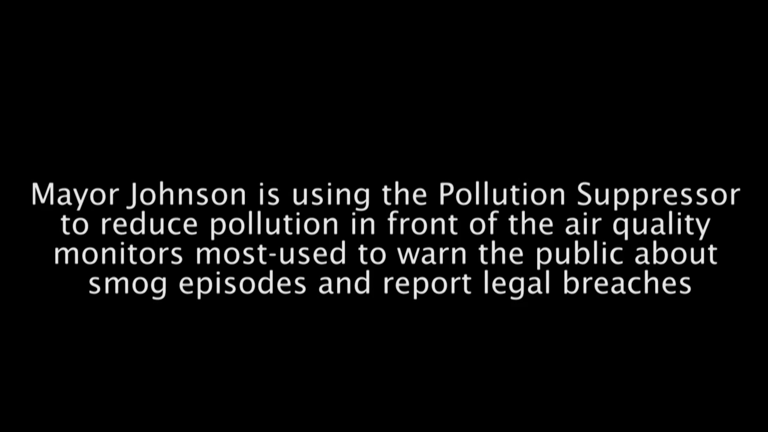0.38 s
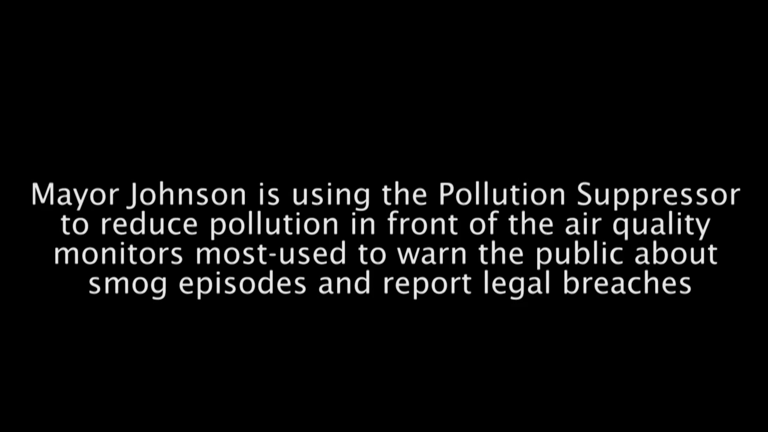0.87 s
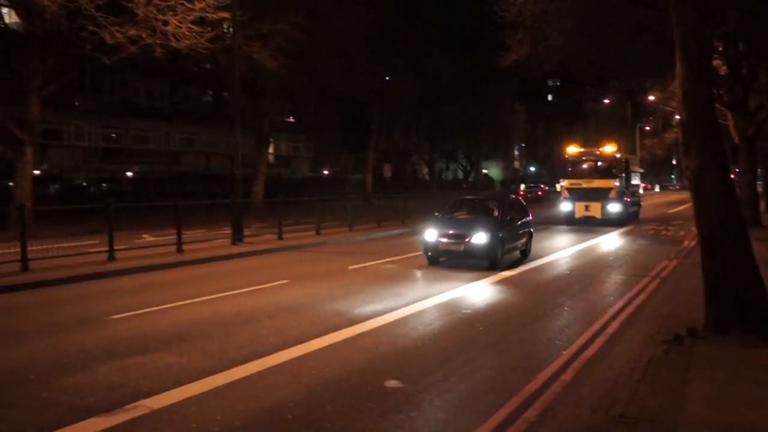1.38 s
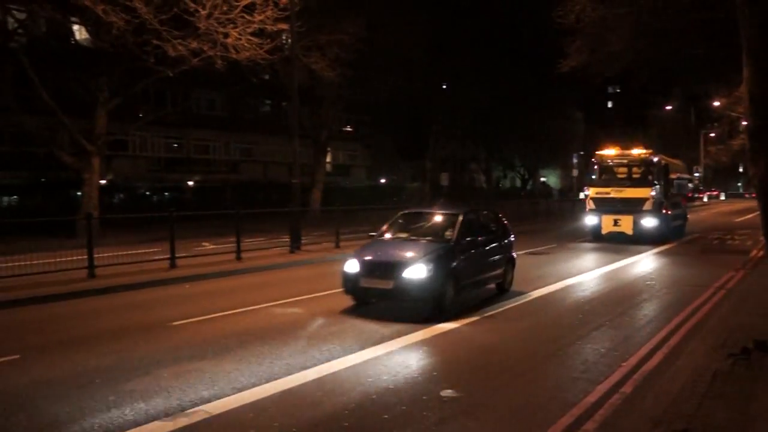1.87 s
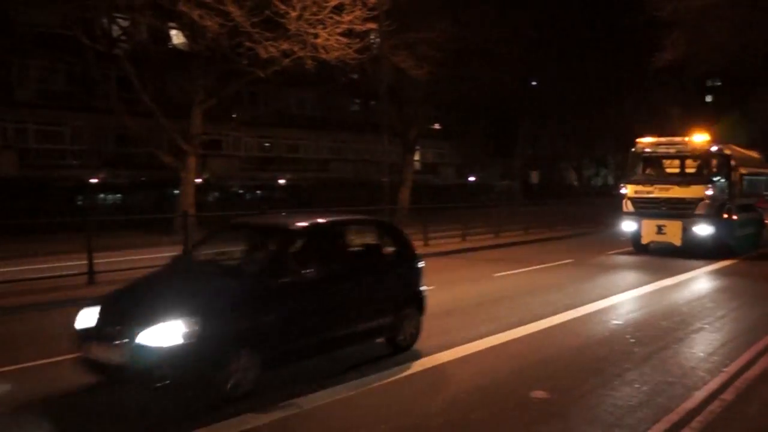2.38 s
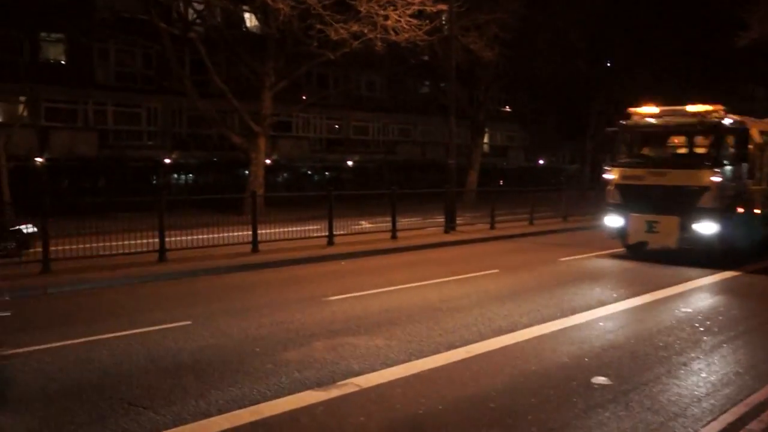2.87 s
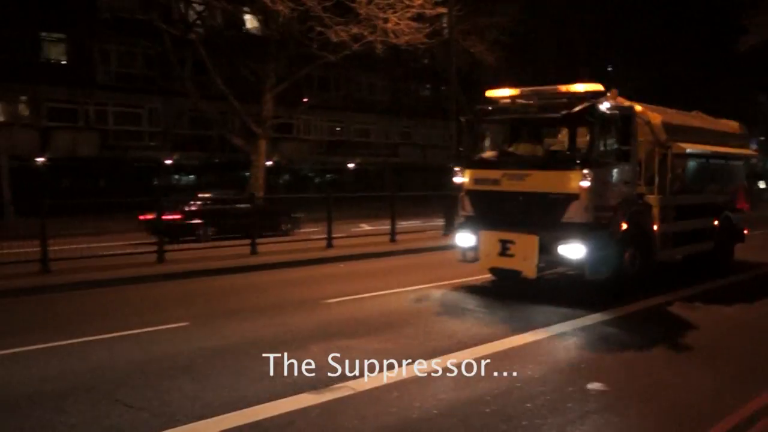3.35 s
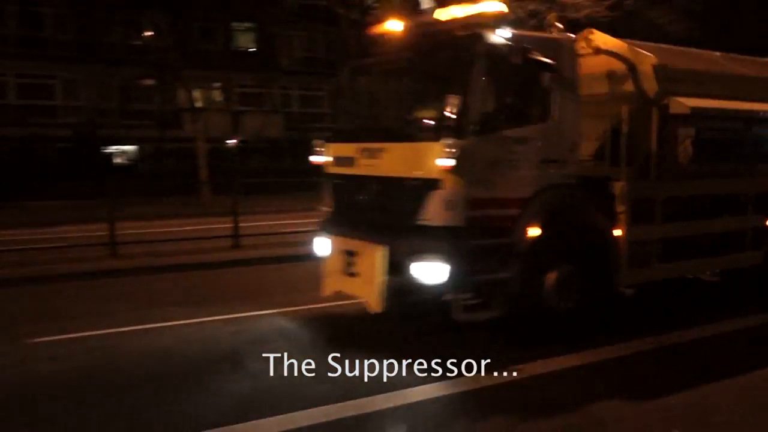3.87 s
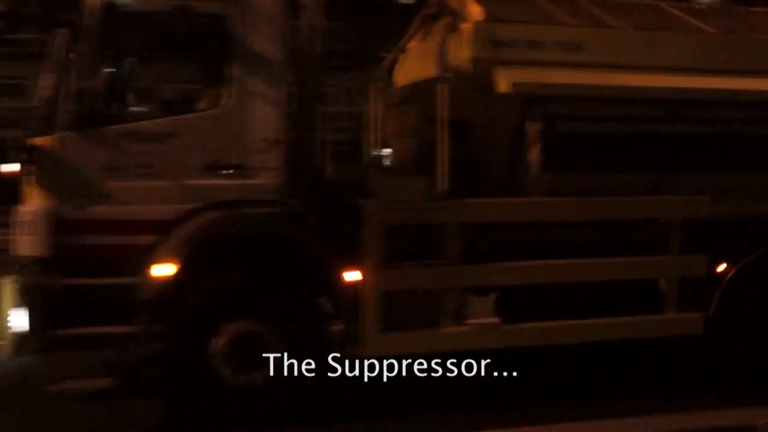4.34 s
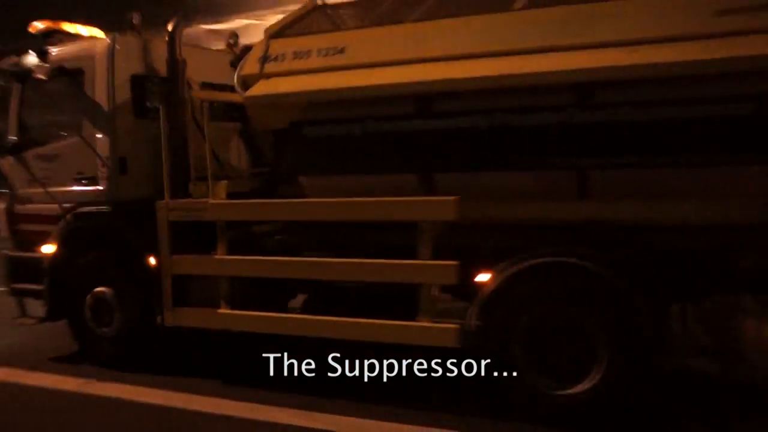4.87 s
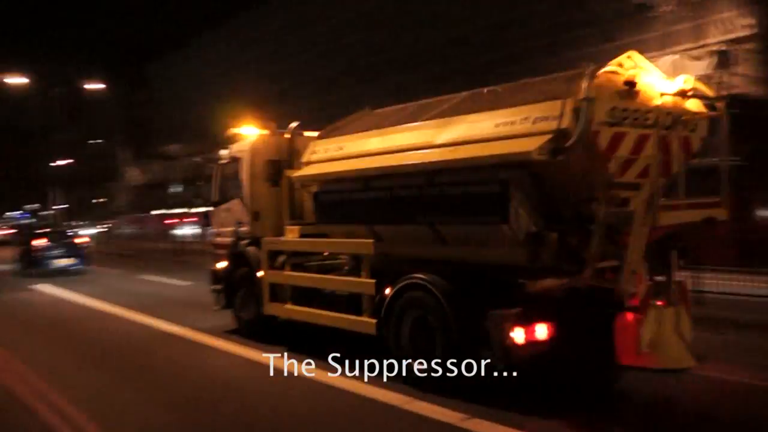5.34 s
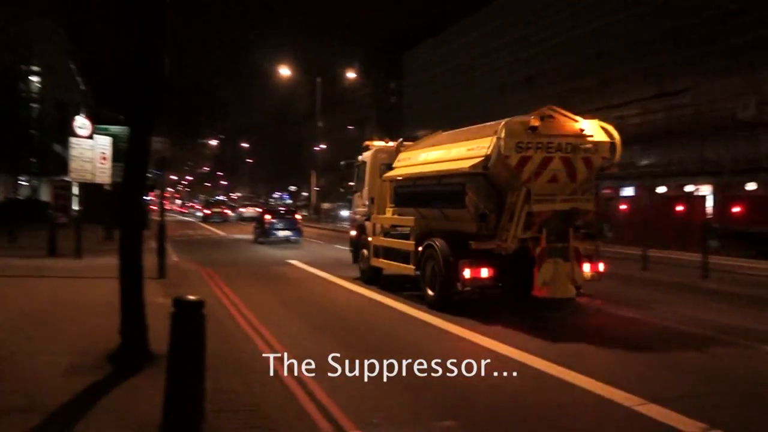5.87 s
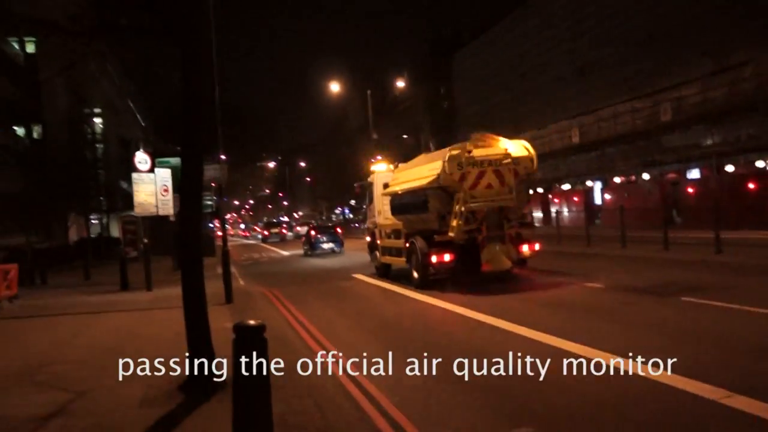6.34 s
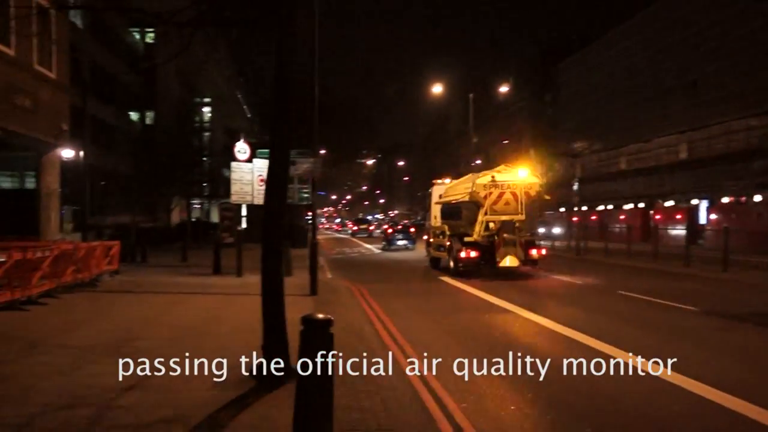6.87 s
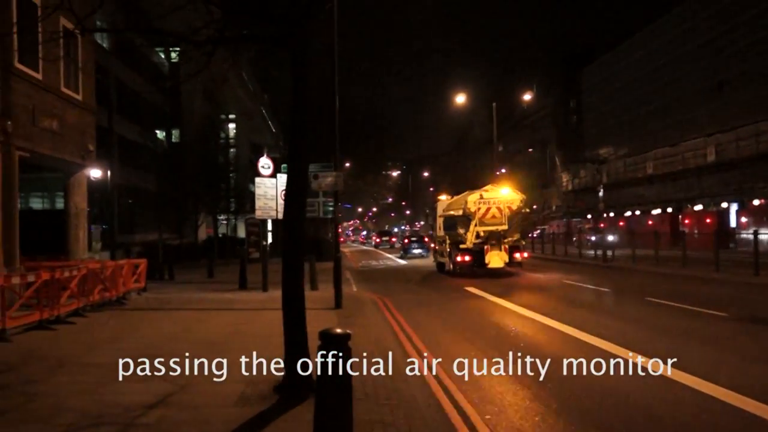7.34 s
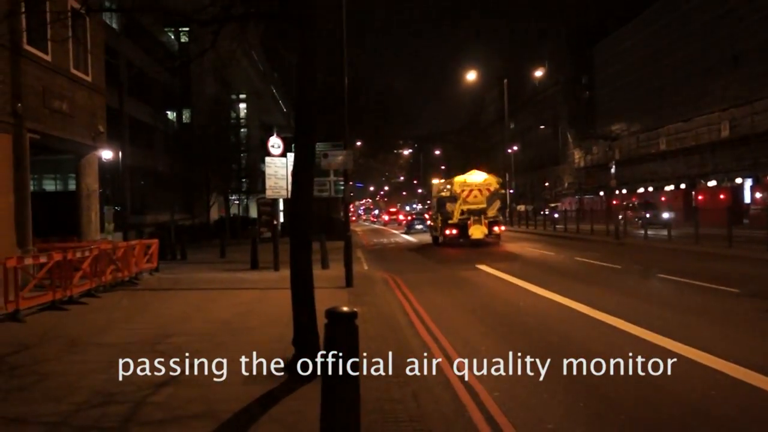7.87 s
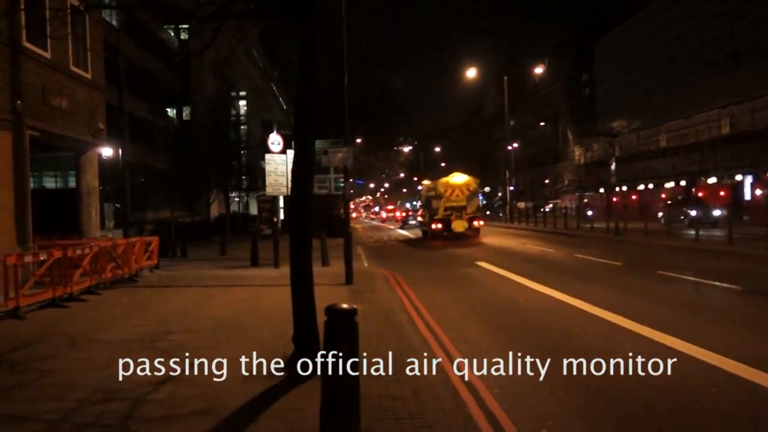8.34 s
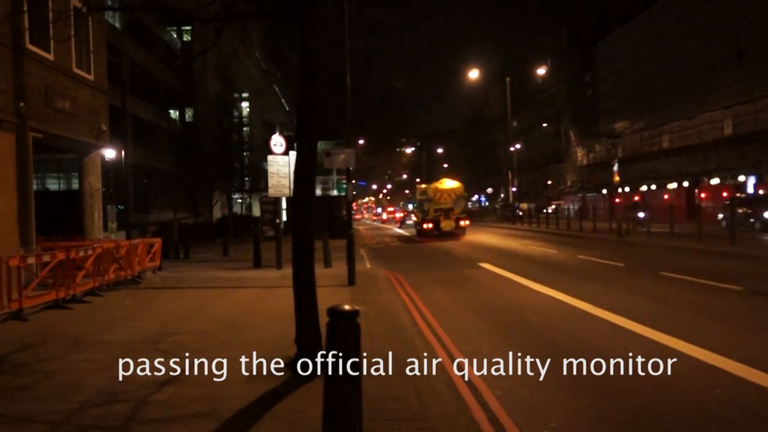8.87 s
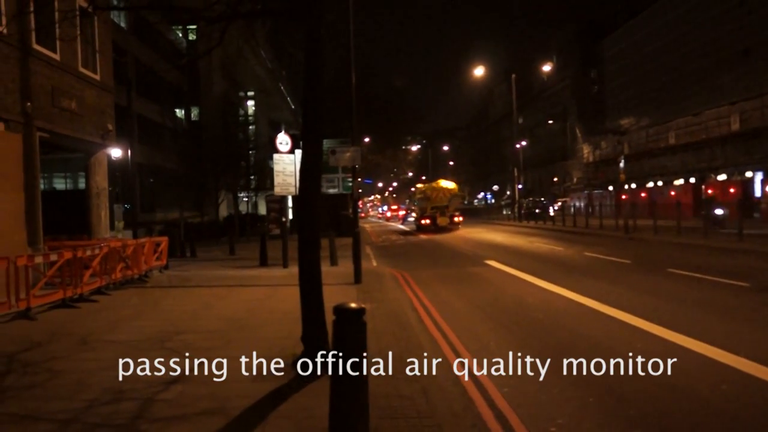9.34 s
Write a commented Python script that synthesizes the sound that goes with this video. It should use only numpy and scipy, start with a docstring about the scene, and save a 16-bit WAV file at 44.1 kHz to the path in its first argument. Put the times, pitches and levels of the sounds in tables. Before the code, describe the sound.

At night by the kerb, a small car whooshes past, then a droning diesel spraying lorry rolls by, hissing and squeaking, before a faint brake squeal.

```python
"""A city road at night, heard from the kerb, fading in: a small car passes, then a spraying lorry rolls by and away.
Tyres, street and spray are coloured noise with levels set by distance; the diesel drones as phase-modulated sines.
The spray pump throbs and ticks at its Doppler-shifted stroke rate, fittings squeak as short rough sines, and a
wheel excites a ringing cover. At the end another vehicle draws near with a rising engine tone and a brake squeal."""
import sys
import numpy as np
from scipy import signal
from scipy.fft import rfft, irfft, next_fast_len
from scipy.io import wavfile
from scipy.ndimage import uniform_filter1d, map_coordinates

SR = 44100
rng = np.random.default_rng(int(sys.argv[2]) if len(sys.argv) > 2 else 0)


def boost_factor(decibels):
    """Convert a level in decibels to a linear amplitude factor."""
    exponent = np.asarray(decibels, float) / 20
    return 10 ** exponent


def wav_out(sig):
    """Save sig, one row per channel (or a flat mono array), as 16-bit PCM at SR to the path in sys.argv[1]."""
    wavfile.write(sys.argv[1], SR, np.round(np.clip(np.atleast_2d(sig).T, -1, 1) * 32767).astype(np.int16))


N = 417627
TIME = np.arange(N) / SR  # s

# the lorry's straight course: (alongside at [s], speed [m/s], nearest distance [m])
LORRY = (4.55, 11.2, 8.4)


def curves(table):
    """Linear interpolation: the columns of a table as sample-rate curves, held at both ends."""
    s, *columns = np.transpose(table)
    return [np.interp(TIME, s, column) for column in columns]


def window(table, edge_s=0.1):
    """Gating: open while a table lasts, with linear ramps outside it."""
    first_s, last_s = table[0][0], table[-1][0]
    return np.interp(TIME, [first_s - edge_s, first_s, last_s, last_s + edge_s], [0, 1, 1, 0])


def along(points, hz):
    """Logarithmic frequency scale: interpolates (frequency, value) points on it."""
    f, value = np.transpose(points)
    return np.interp(np.log(hz + 1), np.log(f), value)


def unit(x):
    """Power normalisation: the mean over channels gets an rms of 1."""
    return x / np.sqrt(np.mean(np.atleast_2d(x).mean(axis=0) ** 2))


def walk(rate):
    """Slow random modulation: levels held 1 / rate s and smoothed twice; spread near 1."""
    hold = int(SR / rate)
    steps = np.repeat(rng.standard_normal(N // hold + 1), hold)
    return 1.3 * uniform_filter1d(uniform_filter1d(steps, hold), hold)[:N]


def band(x, lo_hz, hi_hz):
    """Band limitation by a third-order Butterworth band-pass."""
    sos = signal.butter(3, [lo_hz, min(hi_hz, .45 * SR)], "bandpass", fs=SR, output="sos")
    return signal.sosfilt(sos, x)


def ring(x, modes):
    """Modal resonance: blows excite exponentially decaying sines, each given by frequency, level and t60."""
    t = TIME[:SR // 2]
    response = sum(boost_factor(db) * np.sin(2 * np.pi * hz * t) * 1000 ** (-t / t60) for hz, db, t60 in modes)
    return signal.fftconvolve(x, response)[:N]


def tone(hz, waver):
    """Frequency modulation: the phase of a tone whose pitch wavers by a small share."""
    return 2 * np.pi * np.cumsum(hz * (1 + waver * walk(12))) / SR


def arrive(x, lag):
    """Interaural-type delay: the left channel receives x later than the right by lag samples."""
    return np.array([map_coordinates(x, [np.arange(N) - lag], order=3), x])


def passing(vehicle, later_s=0):
    """Spherical spreading: metres beyond the nearest distance, 1 / r level in dB, share of the speed leading away."""
    at_s, speed, nearest = vehicle
    ahead = speed * (TIME - at_s - later_s)
    r = np.hypot(ahead, nearest)
    return r - nearest, 20 * np.log10(nearest / r), ahead / r


def spread(colour, flicker_db, rate):
    """Partial coherence: coloured noise with a directional share (first row) and unrelated left and right rows."""
    # likeness of the two microphones, clipped to 0-1 below: (frequency [Hz], likeness [power share])
    likeness = [(30, -1), (60, 1.5), (130, 1), (290, 0.9), (640, 0.71), (1400, 0.68), (3100, 0.39),
                (5500, 0.31), (7000, 0.15), (15000, -1.5)]
    length = next_fast_len(N)
    hz = np.arange(length // 2 + 1) * SR / length
    like = np.clip(along(likeness, hz), 0, 1)
    white = rfft(rng.standard_normal((3, length))) * boost_factor(along(colour, hz))
    rows = irfft(white * np.sqrt([like, 1 - like, 1 - like]), length)[:, :N]
    rms = np.std(rows[0] + rows[1:].mean(axis=0))
    return rows * boost_factor(flicker_db * walk(rate)) / rms


def road(lag):
    """Incoherent addition: street, car and lorry add their power; each band fades with distance at its own rate."""
    # noise spectra from low to high: (frequency [Hz], relative spectral density [dB])
    deep, rumble, body = [(13, -42), (22, -24), (36, -7), (50, 4), (66, 0), (86, -35), (150, -120)], [(40, -38), (62, -11), (92, -6.5), (124, -5.5), (156, -3),
                                        (198, -1.5), (235, 0.5), (290, -4), (350, -8.5), (470, -12),
                                        (700, -78)], [(200, -53), (290, -5.5), (380, -1), (480, -1.5),
                                                        (600, -2.5), (750, -5.5), (1000, -9), (1600, -71)]
    tyres, clatter = [(350, -20.5), (500, -4), (700, -0.5), (900, -0.5), (1150, -2), (1450, -4.5),
                      (1900, -9.5), (2600, -28), (4000, -67)], [(800, -44), (1200, 0), (1600, -1), (2000, -0.5), (2500, -0.5),
                                     (2900, -3), (3300, -5), (4000, -8), (5000, -15), (6500, -27.5),
                                     (10000, -70)]
    hiss, mist, highest = [(2500, -33), (3800, -5), (4700, 1.5), (5800, -2), (6300, -3.5), (6700, -4.5),
                           (7900, -6), (9500, -11.5), (12000, -25), (13000, -45), (16000, -80)], [(5000, -35), (7000, -0.5), (8400, 0), (9400, 0), (11000, 0.5),
                                         (13300, -2.5), (13900, -25), (14500, -30), (15500, -70)], [(13000, -40), (13900, -6), (14500, 4), (15000, 1),
                                                       (15900, 0)]
    # one row per spectrum: (street before traffic and screening [dB], car alongside [dB], lorry alongside [dB],
    # lorry part passes later by [s], added behind and subtracted ahead [dB],
    # extra fading beyond the nearest distance, sign ignored [dB/m], flicker [dB], flicker rate [1/s])
    layers = [(-41.5, -40, -60, 0.078, .1, -9, 2, 4.24), (-28.5, -20.5, -21, -0.58, 1, 2.1, 1.5, 6),
              (-29.5, -20, -21, -0.15, 2.5, -0.9, 0.6, 2.64),
              (-22.5, -17.5, -16.5, -0.049, -2, 1.3, 0.5, 12), (-32, -21, -16, -0.025, -1.5, 0, 1.1, 14),
              (-48, -34.5, -24, 0.21, -1.2, 0.18, 1.0, 16), (-82, -42, -32.5, 0.067, 2.5, 0.38, 1, 22),
              (-90, -61, -35.5, 0.22, -2.5, 0.3, -0.5, 22)]
    # other traffic in the street: (time [s], level before each layer's share [dB])
    traffic = [(1.05, 7.5), (1.35, 7), (1.9, 8), (2.4, 6.5), (3.1, 6), (3.7, 6), (4.4, 0), (5.0, 6),
               (5.7, 4.5), (6.4, 3), (7.2, 1.3), (8., -0.3), (8.8, -0.7), (9.45, 2.5)]
    # how far each layer follows the traffic: (share [1]) per layer
    traffic_share = [.1, 0.9, 0.84, 1.08, 0.84, 1.16, .9, .9]
    # the lorry hides the street while alongside: (greatest loss [dB]) per layer
    screen_loss = [9.9, 0.76, 1., 0.83, .1, .1, .1, .1]
    # the small car's straight course: (alongside at [s], speed [m/s], nearest distance [m])
    car = (2.67, 10.4, 6.6)
    traffic_db, = curves(traffic)
    car_m, car_near_db, _ = passing(car)
    hidden = np.exp(-((TIME - LORRY[0]) / 0.7) ** 2)  # spread in s
    colours = (deep, rumble, body, tyres, clatter, hiss, mist, highest)
    out = 0
    for colour, row, share, screen_db in zip(colours, layers, traffic_share, screen_loss):
        street_db, car_db, lorry_db, later_s, behind_db, fading_db, flicker_db, rate = row
        lorry_m, near_db, away = passing(LORRY, later_s)
        street = street_db + share * traffic_db - screen_db * hidden
        small_car = car_db + car_near_db - abs(fading_db) * car_m
        lorry = lorry_db + near_db + behind_db * away - abs(fading_db) * lorry_m
        power = sum(boost_factor(source_db) ** 2 for source_db in (street, small_car, lorry))
        out = out + np.sqrt(power) * spread(colour, flicker_db, rate)
    return arrive(out[0], lag) + out[1:]


def swells(lag):
    """Band-limited noise under Gaussian envelopes: short rushes of roar and hiss, part directional, part scattered."""
    # (time [s], low edge [Hz], high edge [Hz], relative level [dB], spread [s])
    rushes = [(1.67, 750, 1340, -20.5, 0.48), (2.27, 620, 1230, -20, 0.28), (2.97, 490, 1100, -19, 0.27),
              (3.2, 2600, 4900, -26.5, 0.78), (4, 1400, 4100, -23, 0.24), (1.89, 204, 274, -22.5, 0.27),
              (5.22, 168, 290, -27, 0.49), (4.4, 2056, 2850, -26, 0.4), (1.454, 740, 1400, -16.5, 0.07),
              (1.66, 580, 1000, -18, 0.054), (2.64, 620, 880, -20, .07), (3.88, 1390, 1780, -21, 0.29),
              (9.3, 5700, 8100, -45, 0.28), (5.58, 2900, 4900, -26, 0.16), (2.35, 5000, 8600, -35, .1),
              (3.3, 130, 470, -19.5, 0.41), (3.42, 4440, 5800, -22.5, 0.041), (3.8, 1400, 4600, -22, 0.12),
              (5.2, 1600, 4050, -23, 0.37), (5.38, 1100, 2900, -16.5, 0.044), (6.06, 186, 500, -23, 0.72),
              (8.66, 167, 290, -31.5, 0.91), (6.88, 147, 190, -28.5, .5)]
    out = 0
    for s, lo_hz, hi_hz, db, spread_s in rushes:
        noise = unit(band(rng.standard_normal((3, N)), lo_hz, hi_hz))
        out = out + boost_factor(db) * np.exp(-((TIME - s) / spread_s) ** 2) * noise / 2
    return arrive(out[0], lag) + out[1:] / 2


def engines():
    """Harmonic series: diesel firing tone and overtones, plus the next vehicle, a boom, growls and a whine."""
    # diesel drone: (time [s], firing rate [Hz], level [dB])
    diesel = [(1.2, 81.3, -36), (1.9, 81.9, -24.5), (2.4, 80.6, -42), (2.9, 78.7, -18.5),
              (3.45, 77.8, -22.5), (3.65, 77, -27), (4.05, 75.9, -31), (4.2, 76, -24), (4.55, 76, -34),
              (4.85, 77.9, -30), (5.4, 79.9, -44), (5.7, 80.2, -31), (6.15, 79, -41), (6.5, 79.2, -40),
              (7.3, 79.34, -40), (9.47, 75.2, -54)]
    # diesel overtones: (multiple [1], strongest at [s], level then [dB], spread [s], level elsewhere [dB])
    overtones = [(2, 2.85, -29, 0.15, -40), (3, 2.58, -25, 0.15, -38)]
    # next vehicle's engine, low boom rising after the bumps, faint whine as the lorry leaves:
    # (time [s], frequency [Hz], level [dB])
    next_engine, boom, whine = [(8.2, 103, -44), (8.7, 103.3, -40), (9.05, 107.7, -37), (9.47, 112, -34)], [(5.36, 135.7, -34), (5.45, 139.6, -21),
                                                     (5.6, 145, -28), (5.75, 153.7, -34), (5.901, 164, -49)], [(4.9, 1010, -42), (5.4, 1000, -33),
                                                                   (5.8, 1000, -35), (6.4, 990, -42)]
    # short rising growls, one table each: (time [s], frequency [Hz], level [dB])
    growls = [
        [(3.08, 152.3, -34), (3.21, 161, -17), (3.3, 184, -31), (3.38, 204, -26), (3.45, 209, -40)],
        [(8.3, 153, -39), (8.45, 157, -31), (8.56, 178, -32), (8.65, 183, -44)],
    ]
    firing_hz, firing_db = curves(diesel)
    phase = tone(firing_hz, .012)
    out = boost_factor(firing_db + 2.3 * walk(9)) * np.sin(phase + .7 * walk(20))
    for multiple, at_s, peak_db, spread_s, rest_db in overtones:
        swell_db = rest_db + (peak_db - rest_db) * np.exp(-((TIME - at_s) / spread_s) ** 2)
        out = out + boost_factor(swell_db + 3.5 * walk(9)) * np.sin(multiple * phase + 1.6 * walk(25))
    for table in (next_engine, boom, whine, *growls):
        tone_hz, tone_db = curves(table)
        out = out + boost_factor(tone_db + 1.5 * walk(14)) * np.sin(tone(tone_hz, 0.0046)) * window(table)
    return np.sqrt(2) * out  # levels are rms


def pump():
    """Doppler effect: casing throb, valve and nozzle rings and puffs at each stroke sink as the lorry passes."""
    # casing throb: (multiple of the stroke rate [1], relative level [dB])
    throb_partials = [(6, -10), (7, -1), (8, 10), (9, 0), (10, 2), (11, 5), (12, -8), (14, 3), (20, -6)]
    # throb, valve, nozzle, tick, screened by the tank until they face the kerb:
    # (in full view from [s], until [s], level [dB], rise [dB/s], fall [dB/s], waver [dB])
    pump_parts = [(4.6, 5.2, -19.5, 18, 30, .8), (5.18, 5.58, -33, 60, 70, .3),
                  (4.88, 6.65, -35, 12, 20, 1.5), (4.3, 5.3, -38, 9, 10, 1)]
    # the valve tick dips briefly: (time [s], spread [s], loss [dB])
    dip_s, dip_spread_s, dip_db = (5.41, .04, 11)
    stroke_rate, valve_hz, nozzle_hz = 32.25, 6310, 9573  # strokes per s and ring pitches at the source
    stroke_s, sound_m_s = 5.308, 343  # moment of one stroke, speed of sound
    doppler = 1 - passing(LORRY)[2] * LORRY[1] / sound_m_s
    turns = np.cumsum(stroke_rate * doppler) / SR
    turns = turns - turns[int(stroke_s * SR)]
    throb = 0
    for multiple, db in throb_partials:
        angle = 2 * np.pi * (multiple * turns + rng.random())
        throb = throb + boost_factor(db + 2.2 * walk(10)) * np.sin(angle + .7 * walk(22))
    # every stroke draws its own strength for valve, nozzle and tick
    count = np.floor(turns - turns[0] // 1).astype(int)
    strength = boost_factor([.8, 2., 1.7] * rng.standard_normal((count[-1] + 1, 3)))[count].T
    since = turns % 1  # share of the stroke elapsed
    valve = strength[0] * since * np.exp(-since / .1) * np.sin(tone(valve_hz * doppler, .006))
    valve = valve * boost_factor(-dip_db * np.exp(-((TIME - dip_s) / dip_spread_s) ** 2))
    # the nozzle ring is rough and never quite stops between strokes
    puff = np.exp(-((since - .7) % 1) / .2)
    rough = unit(band(rng.standard_normal(N), 30, 380))
    nozzle = strength[1] * (.22 + puff) * rough * np.sin(tone(nozzle_hz * doppler, .006))
    tick = band(strength[2] * puff * rng.standard_normal(N), 8200, 14500)
    out = 0
    for (from_s, until_s, db, rise, fall, waver_db), x in zip(pump_parts, (throb, valve, nozzle, tick)):
        loss_db = rise * np.maximum(from_s - TIME, 0) + fall * np.maximum(TIME - until_s, 0)
        out = out + boost_factor(db - loss_db + waver_db * walk(4.41)) * unit(x)
    return out


def squeaks():
    """Friction-driven vibration: rubbing fittings whistle roughly, each opening with a scrape of noise."""
    # (onset [s], relative level [dB], pitch [Hz], Gaussian decay length [s])
    fittings = [(2.6594, -29, 7320, 0.022), (2.873, -28, 7500, 0.018), (2.898, -32, 7400, .02),
                (2.93, -35, 7360, 0.02), (2.978, -25, 7370, 0.017), (3.019, -27, 7170, 0.012),
                (3.0894, -32, 7500, 0.02), (3.179, -22, 7380, 0.014), (4.37, -24, 6280, 0.02),
                (4.64, -20, 7970, 0.014), (5.054, -18, 8160, 0.018), (5.15, -23, 8010, 0.02),
                (5.24, -18, 7210, 0.015), (5.464, -22, 7150, 0.015), (5.467, -24, 7700, 0.012),
                (5.47, -21, 8150, 0.023), (5.512, -21, 8120, 0.013), (5.654, -25, 7060, 0.017),
                (8.511, -41, 7320, 0.02)]
    out = np.zeros(N)
    chance = unit(band(rng.standard_normal(N), 150, 600))
    scrape = unit(band(rng.standard_normal(N), 6900, 8800))
    for s, db, hz, length in fittings:
        i, t = int(s * SR), TIME[:int(4 * length * SR)]
        part = slice(i, i + len(t))
        whistle = np.exp(-(t / length) ** 2) * (1 + 0.74 * chance[part]) * np.sin(2 * np.pi * hz * t)
        onset = 1 - np.exp(-t / .002)
        out[part] += boost_factor(db) * onset * (whistle + .35 * np.exp(-t / .01) * scrape[part])
    return out


def bumps():
    """Impulse excitation: wheels crossing a cover give a clack of decaying noise and a low modal ring."""
    # (time [s], clack level [dB], thud blow before the mode's own level [dB])
    crossings = [(5.361, -29, -33), (5.384, -27, -31), (5.518, -34, -42)]
    # modes of the cover: (frequency [Hz], level [dB], t60 [s])
    cover = [(123, 8, 0.81)]
    clack, thud = np.zeros((2, N))
    for s, clack_db, thud_db in crossings:
        clack[int(s * SR)] = boost_factor(clack_db)
        thud[int(s * SR)] = boost_factor(thud_db)
    tail = signal.fftconvolve(clack, np.exp(-TIME[:SR // 10] / 0.015))[:N]
    return ring(thud, cover) + tail * unit(band(rng.standard_normal((2, N)), 2000, 4700))


def squeal():
    """Self-excited oscillation: a brake sings unsteadily off to the right, with a rough upper note and a rasp."""
    # (time [s], pitch [Hz], level before the parts' own gains [dB])
    brake = [(8.6, 3060, -60), (8.7, 3060, -41), (8.78, 3060, -41.5), (8.93, 3045, -38.5),
             (9.08, 3030, -38.5), (9.26, 3000, -41.5), (9.36, 3010, -37.5), (9.47, 2980, -40)]
    hz, db = curves(brake)
    song = np.sqrt(2) * np.sin(tone(hz, .008) + .8 * walk(160)) * boost_factor(1.2 + 2.4 * walk(25))
    rasp = boost_factor(3) * unit(band(rng.standard_normal((2, N)), 2800, 3750))
    upper = boost_factor(-3) * unit(band(rng.standard_normal(N), 3480, 3620))
    return boost_factor(db) * window(brake) * (1.3 * arrive(song + upper, 3.8) + rasp)  # lag in samples


def scene():
    """Superposition: all sources, placed by level and lag between the two microphones."""
    # drifting direction of the loudest source: (time [s], left lag [samples], left minus right [dB])
    direction = [(1.1, 3, 0), (1.6, 3, -1), (2.5, 3.1, -2), (3.3, 3.3, -4), (4.1, 0.65, -3.5),
                 (4.75, .1, -2.5), (5.5, 1.05, -3), (6.3, 2.1, -1.5), (9.4, 2.51, -2)]
    lag, pan_db = curves(direction)
    points = arrive(engines() + pump(), lag) + arrive(squeaks(), 1.3) + bumps() + squeal()
    return (road(lag) + swells(lag) + points) * boost_factor(np.array([pan_db, -pan_db]) / 2)


def roll_off(x):
    """The treble ends steeply here."""
    return signal.sosfilt(signal.butter(12, 16160, fs=SR, output="sos"), x)


def record(dry):
    """Dynamic compression: unlike microphones, gain control, rounded peaks, a treble cut and a fade-in."""
    # microphone pair: (frequency [Hz], left minus right [dB])
    ears = [(60, 1), (400, 0), (1300, 2.5), (3000, -3), (5500, 4), (9000, -3), (15000, -5)]
    gain_top_db, gain_ratio, gain_s = -21, 1.89, 0.16  # threshold, compression ratio, averaging time
    fade_start_s, fade_s, fade_power = 0.95, 0.44, 1.02
    length = next_fast_len(N)
    tilt_db = along(ears, np.arange(length // 2 + 1) * SR / length) / 2
    x = irfft(rfft(dry, length) * boost_factor(np.array([tilt_db, -tilt_db])), length)[:, :N]
    memory = np.exp(-1 / (gain_s * SR))
    power = np.mean(x, axis=0) ** 2
    heard_db = 10 * np.log10(signal.lfilter([1 - memory], [1, -memory], power) + 1e-9)
    x = x * boost_factor(-np.maximum(heard_db - gain_top_db, 0) * (1 - 1 / gain_ratio))
    x = np.tanh(.6 * x) / .6
    x = signal.sosfilt(signal.ellip(8, .2, 70, 15850, fs=SR, output="sos"), x)  # low-pass, edge in Hz
    fade = np.clip((TIME - fade_start_s) / fade_s, 0, 1) ** fade_power
    return roll_off(x * fade)


dry = scene()
out = record(dry)
wav_out(out)
```